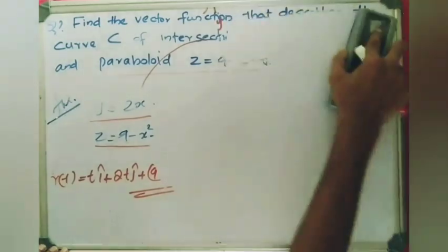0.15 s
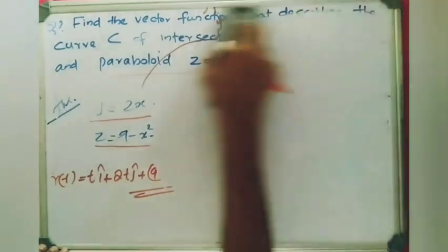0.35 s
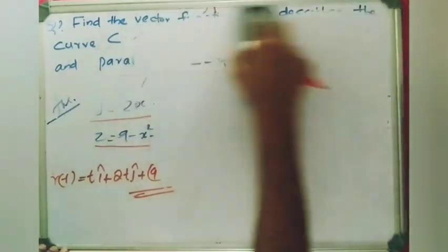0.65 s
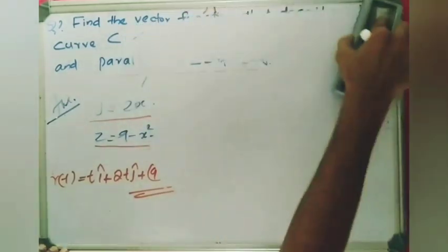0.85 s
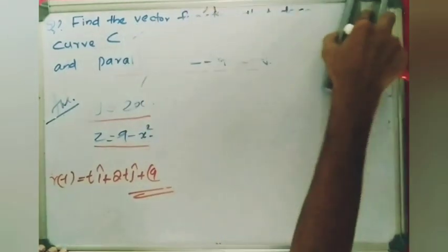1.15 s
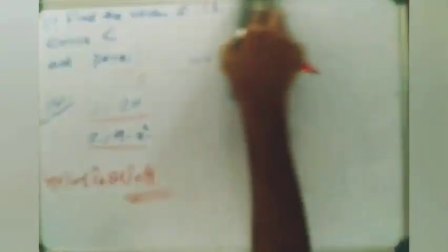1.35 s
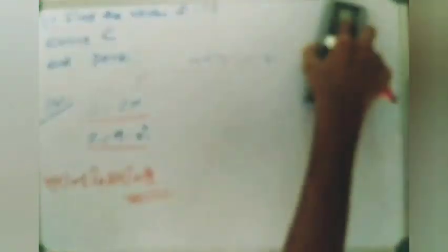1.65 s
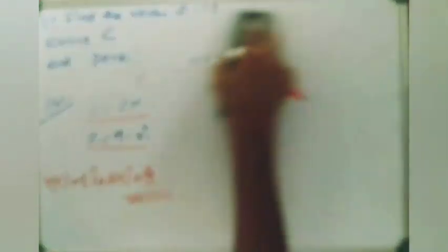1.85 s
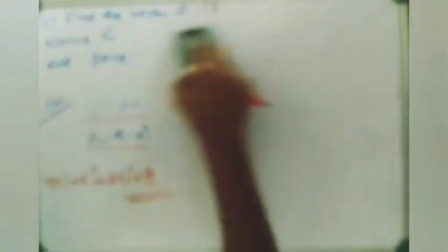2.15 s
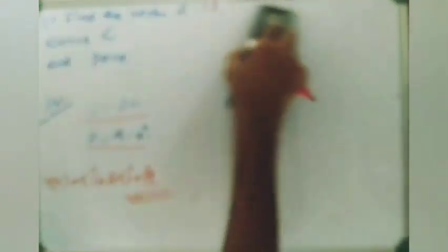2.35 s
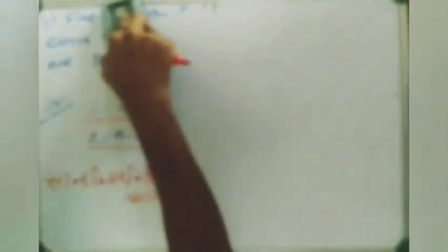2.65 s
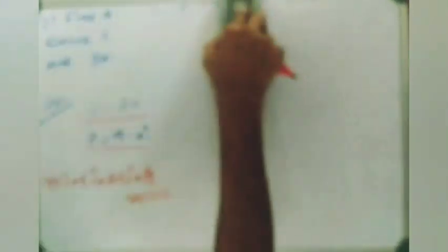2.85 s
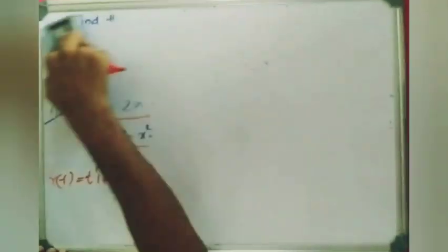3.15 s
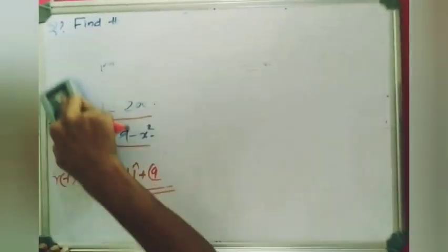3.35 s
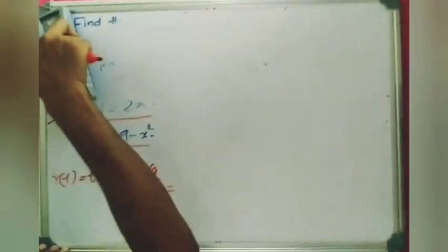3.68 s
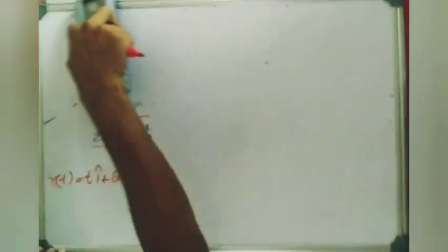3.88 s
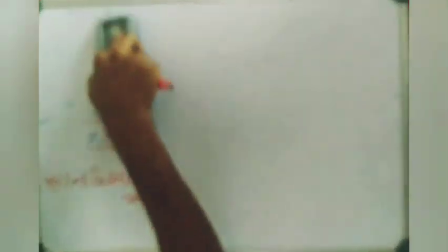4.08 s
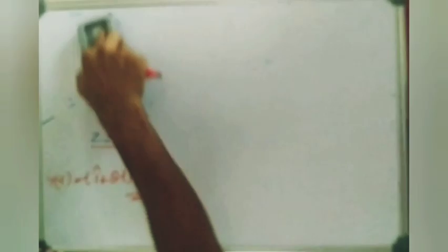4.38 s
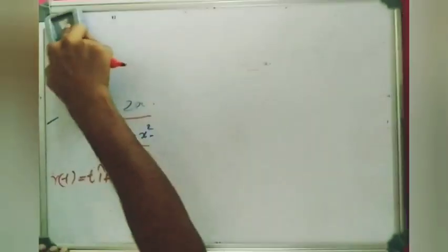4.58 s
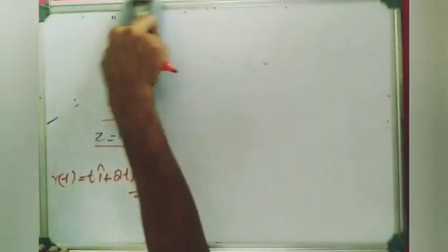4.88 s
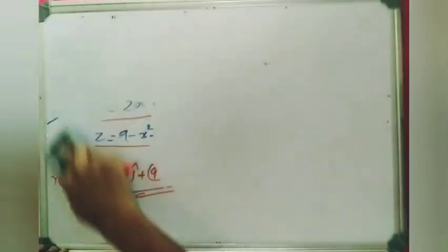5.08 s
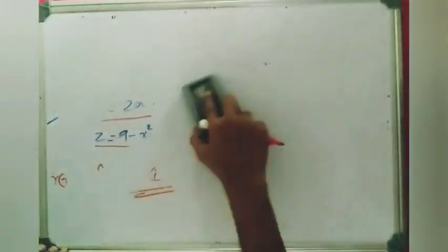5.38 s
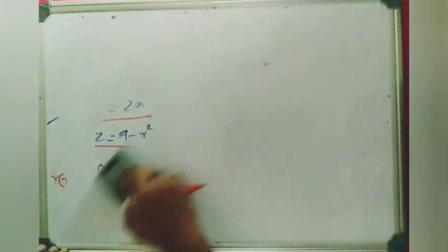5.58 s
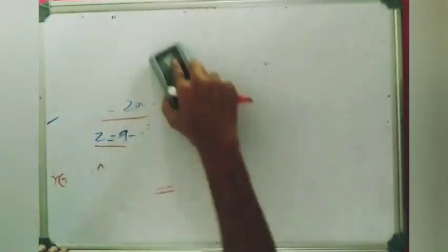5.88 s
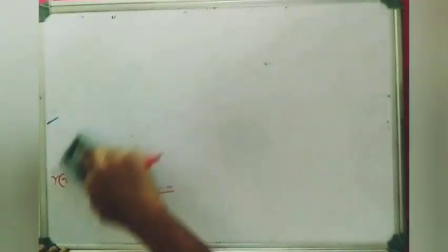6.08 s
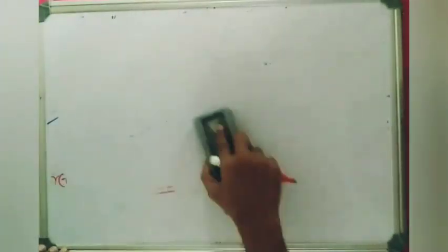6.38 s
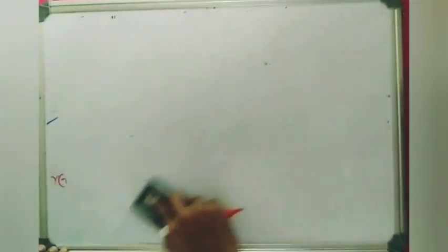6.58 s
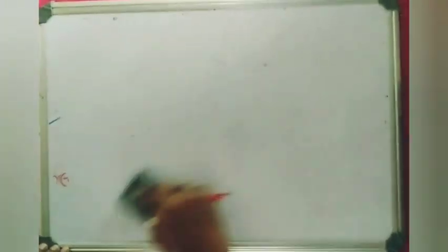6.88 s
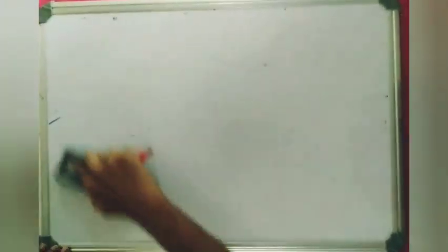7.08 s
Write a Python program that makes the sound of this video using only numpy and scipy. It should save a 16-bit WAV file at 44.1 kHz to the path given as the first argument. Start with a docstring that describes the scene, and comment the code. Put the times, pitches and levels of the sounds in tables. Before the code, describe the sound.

An eraser wipes a hanging board in brisk uneven strokes, each hiss swelling and brightening with speed. The first half is nearly all rubbing; the second adds panel thuds, plastic taps, small groans and a firmer bump near the end. Stereo microphones sit close in a small room. Behind are a low engine drone falling in pitch, a high insect chorus with falling whistles, and a faint hum.

```python
"""The hiss of felt comes first, close by: an eraser wipes a hanging whiteboard in quick strokes, in a small room.
Noise that follows the hand's speed makes the hiss; bands of slips make faint squeaks; blows and slips ring
the modes of panel and case as light knocks, soft thuds and two spells of hollow scraping drags.
Far outside, a motorbike's firing harmonics ease off and coast, a gliding tone repeats an insect's falling
whistle and a farther engine drones late on; coloured noise gives rumbling air and a chorus of insects."""
import sys
import numpy as np
from scipy import signal
from scipy.fft import rfft, irfft
from scipy.io import wavfile
from scipy.ndimage import uniform_filter1d

SR = 44100
rng = np.random.default_rng(int(sys.argv[2]) if len(sys.argv) > 2 else 0)


def transcribe(signal):
    """Save signal, clipped to [-1, 1], as a 16-bit WAV file at the path in sys.argv[1]."""
    frames = np.atleast_2d(signal).T
    limited = np.clip(frames, -1, 1)
    pcm = np.round(limited * 32767).astype(np.int16)
    wavfile.write(sys.argv[1], SR, pcm)


N = 318828
T = np.arange(N) / SR  # time of each sample, s
HZ = np.fft.rfftfreq(N, 1 / SR)

# On the board, close to the microphones. Levels here are relative: each source adds its own trim.
# sweeps of the hand: start_s, length_s, fastest_point (share of the length), friction_db, extra_treble_db
HAND_SWEEPS = [(-.06, 0.29, 0.45, -56, -3.5), (0.207, 0.34, 0.7, -51.5, -2), (0.537, 0.39, 0.31, -56, 1),
               (0.902, 0.16, 0.14, -55, 1.5), (1.057, 0.11, 0.57, -53, -1), (1.157, 0.36, 0.58, -54, -0.5),
               (1.506, 0.22, 0.45, -56, 1.5), (1.724, 0.37, 0.51, -54, -1), (2.064, 0.27, 0.47, -57, -0.5),
               (2.332, 0.34, 0.74, -52.5, -1.5), (2.674, 0.25, 0.55, -53.5, -0.5),
               (2.916, 0.37, 0.41, -54, -1), (3.237, .22, 0.16, -56, 0.5), (3.448, 0.28, 0.4, -60.5, 2.5),
               (3.757, 0.4, 0.23, -54.5, 1.5), (4.124, 0.18, 0.49, -58.5, 2), (4.295, 0.33, 0.72, -57, 2.5),
               (4.634, 0.23, 0.32, -53.5, 2), (4.866, .16, 0.41, -54, 0.5), (4.97, 0.41, 0.38, -56, -1),
               (5.285, 0.19, 0.22, -52.5, -3), (5.47, 0.23, 0.47, -53.5, -2),
               (5.7, 0.27, 0.43, -54.5, -1.5), (5.939, 0.24, 0.41, -53, -1), (6.12, 0.32, 0.81, -56.5, 1.5),
               (6.412, 0.48, 0.29, -55.5, 1), (6.84, 0.25, 0.27, -56, -0.5),
               (7.053, 0.28, 0.46, -58.5, 1.5)]
# the felt's colour: frequency_hz, density_db (dB per Hz)
FELT_COLOUR = [(150, 1), (400, 1), (800, -9.5), (1500, -8.5), (1950, 0.5), (2250, 0), (2700, 3), (4000, 1),
               (6200, 0), (8500, -1.5), (12000, -4.5), (15800, -6.5)]
# the felt's edge catches: peak_s, level_db, length_s
EDGE_CATCHES = [(0.43, -55, 0.07), (1.93, -54, 0.062), (3.18, -53, 0.09), (3.772, -48.5, 0.054),
                (3.85, -50.5, 0.031), (4.068, -50.5, 0.077), (4.505, -52, 0.063), (5.22, -48, 0.024),
                (6.595, -50.5, 0.054), (6.675, -50, 0.024)]
# slow bending of the panel: mode_hz, width_hz, level_db
BENDING_MODES = [(236, 71, -17), (302, 120, 5.5), (380, 56, 3), (530, 250, -9)]
# soft thuds of the panel as the hand turns round: peak_s, level_db, length_s, pitch_factor (for that spot)
PANEL_THUDS = [(3.291, -62, 0.046, 1.26), (3.799, -59.5, 0.12, 0.92), (3.858, -65, 0.043, 1.2),
               (4.335, -58, 0.042, 1.05), (4.905, -60, 0.037, 1.5), (4.939, -61.5, 0.058, 1.37),
               (5.142, -59, .06, 1.06), (5.347, -61, .08, 1), (5.474, -60, .05, 0.97),
               (5.776, -61.5, 0.16, 0.98), (5.947, -58, 0.058, 1.02), (6.765, -59.5, .03, 1),
               (6.835, -47.5, 0.036, 1)]
# faint squeaks and groans of the felt: start_s, length_s, first_hz, last_hz, level_db, roughness (0-1)
FELT_SQUEAKS = [(2.81, 0.1, 7500, 7200, -61, .9), (4.03, 0.09, 4530, 4600, -57.5, .9),
                (4.405, 0.07, 1940, 2080, -56.5, .55), (4.423, 0.057, 1550, 1570, -58, 0.5),
                (4.45, .058, 1890, 1840, -59, 0.5), (4.5, 0.088, 2030, 1990, -70, 0.9),
                (4.575, 0.081, 1990, 1910, -58, .55), (6.024, 0.069, 6000, 6100, -56, .9),
                (6.58, 0.052, 1960, 1900, -62, 0.2), (6.62, 0.121, 580, 773, -60, .5),
                (6.68, 0.12, 1120, 1120, -62, .3), (6.718, 0.036, 1960, 1990, -69, 0.1),
                (6.721, 0.086, 730, 560, -62, .55), (6.849, 0.085, 702, 604, -60.5, .5),
                (6.93, 0.16, 750, 630, -62, .55), (6.93, 0.11, 1140, 1098, -66.5, 0.4)]
# the eraser knocks on the board: time_s, strength_db, case_share_db
ERASER_KNOCKS = [(3.275, -56.5, -12), (3.762, -63, 10), (3.85, -54.5, -16), (4.058, -62, 6),
                 (4.357, -62, -5), (4.892, -65, -9), (4.93, -65, 0), (5.024, -55, -18), (5.306, -59, -10),
                 (5.465, -51, -4), (5.668, -58, -18), (5.723, -67, 14), (5.927, -52, -7), (6.594, -66, 10),
                 (6.706, -61, -14), (6.76, -61, -14), (6.823, -47.5, -3)]
# modes of the board: mode_hz, width_hz, level_db
BOARD_MODES = [(290, 33, -1.5), (434, 50, -0.5), (538, 28, 2.5), (582, 55, 1), (662, 63, 4.5), (768, 56, 4),
               (830, 110, -5.5), (900, 59, -9), (975, 57, -2), (1090, 16, 3.5)]
# modes of the eraser's plastic case: mode_hz, width_hz, level_db
CASE_MODES = [(1460, 320, -1), (1780, 200, 1), (1890, 70, 3.5), (2160, 150, -4), (2430, 320, -9)]
# hollow drags of the eraser: start_s, loudest_s, end_s, panel_db, case_db
ERASER_DRAGS = [(4.354, 4.452, 4.95, -73, -61), (4.476, 4.55, 4.6, -67, -63), (6.555, 6.643, 6.9, -64, -66),
                (6.585, 6.732, 6.86, -54, -69), (6.757, 6.877, 7.25, -60.5, -68)]
SPEED_LAW = 0.54  # friction amplitude grows as hand speed to this power
TURN_DB = -65.5  # friction left while the hand turns round
LINGER_DB, LINGER_S = -15, 0.054  # the room carries some of each sweep's hiss across the turn

# Outside, far off.
# the motorbike's engine: time_s, firing_hz (firings per s)
ENGINE_FIRING = [(0, 24.7), (1, 24.65), (1.5, 24.45), (1.92, 24.25), (2.1, 23.2), (2.25, 23.8), (3, 23.2),
                 (3.7, 22.5), (4.2, 21.9), (5, 21.1), (5.5, 20.6), (6, 20.1), (6.5, 19.7), (7.23, 19.2)]
# its lowest harmonics, past walls and houses: time_s, boom_db (third), drone_db (fourth), hum_db (fifth)
LOW_HARMONICS = [(0, -74, -54, -65), (.3, -68, -46, -60), (.55, -68, -46, -63), (.7, -72, -51, -70),
                 (.9, -78, -48.5, -70), (1.25, -72, -49, -62), (1.6, -76, -55, -75), (1.98, -58, -52, -66),
                 (2.15, -54, -42.5, -62), (2.42, -56, -41, -59), (2.65, -48, -49, -60),
                 (2.8, -61, -56, -59), (3.15, -64, -49.5, -60), (3.6, -54, -51, -59), (3.8, -50, -46, -62),
                 (4.25, -55, -42.5, -64), (4.6, -56, -52, -53.5), (5, -61, -50.5, -57.5),
                 (5.5, -65, -50.5, -58), (5.85, -70, -57, -54.5), (6.15, -77, -53.5, -57),
                 (6.4, -76, -58, -50.5), (6.58, -74, -64, -68), (7.23, -79, -68, -81)]
# throttle: time_s, opening (0-1)
THROTTLE_OPENING = [(0, 0.6), (.6, 0.8), (1.1, 0.55), (1.4, 0.85), (1.85, 0.73), (2.05, 0.18)]
# coasting, four times in s: begins_s, fully_heard_s, starts_to_fade_s, gone_s
COAST_TIMES_S = (2.05, 2.2, 6.4, 6.55)
# exhaust under power: multiple (of the firing rate), level_db (at full throttle), change_db_per_s
POWERED_HARMONICS = [(6, -58, 2.5), (7, -64.5, -2), (8, -62.5, 1.5), (9, -65.5, 1), (10, -66, -11),
                     (11, -80.5, 4), (12, -66.5, 4), (13, -65, -1.5), (14, -78, 0), (18, -72, 1.5)]
# exhaust while coasting: multiple (of the firing rate), first_level_db, change_db_per_s
COASTING_HARMONICS = [(6, -56, -6.5), (7, -73.5, 2)]
# exhaust noise: frequency_hz, density_db (dB per Hz)
EXHAUST_ROAR = [(60, -35), (140, -13), (300, -1), (600, -8.5), (1200, -12), (1800, -15.5), (4000, -27),
                (15000, -78)]
# a farther engine comes and goes, one row: start_s, end_s, first_hz, last_hz, level_db
FARTHER_ENGINE = (5.5, 8, 191, 187, -64)
# the insect's slurs, about two a second: loudest_s, level_db
INSECT_SLURS = [(-.06, -63), (.4, -63), (.9, -67), (1.401, -66), (1.9, -60), (2.38, -61), (2.85, -64),
                (3.38, -56.5), (3.95, -56.5), (4.5, -61), (4.93, -57.5), (5.45, -59), (5.819, -57),
                (6.271, -54.5), (6.78, -55), (7.2, -63)]
# course of one slur: time_s (from its loudest moment), pitch_hz, level_db
SLUR_COURSE = [(-.8, 10520, -11), (-.4, 10200, -8), (-.15, 10010, -1), (.1, 9800, 0), (.3, 9640, -2),
               (.45, 9540, -12)]
# pitches the room favours in the whistle: peak_hz, width_hz, level_db
ROOM_WHISTLE_PEAKS = [(9585, 30, 0), (9730, 40, 0), (9790, 40, -5), (9860, 50, -2), (9975, 35, 0),
                      (10120, 35, 0), (10300, 80, -7), (10440, 40, -1)]
# farther insects: frequency_hz, density_db (dB per Hz)
INSECT_CHORUS = [(8600, -11), (9300, -3.5), (9600, 2.5), (9950, 6.5), (10200, 3), (10500, -2), (10750, -30),
                 (11000, -31)]

# The place and the pair of microphones.
# still room: frequency_hz, density_db (dB per Hz)
ROOM_AIR = [(12, -3), (26, -13), (33, -1), (41, 2), (53, -14.5), (100, -8.5), (160, -20.5), (250, -26.5),
            (500, -30.5), (1000, -31), (1600, -36), (3000, -46), (8000, -54), (15800, -77)]
# steady hum: pitch_hz, level_db
HUM_TONES = [(196, -76), (603, -82.5), (1107, -92)]
# likeness of left and right in diffuse sound: frequency_hz, likeness (0-1)
LEFT_RIGHT_LIKENESS = [(40, 0.96), (130, 0.93), (300, 0.99), (600, 0.35), (1200, 0.017), (3000, 0.014),
                       (15000, 0.022)]
# colour difference of the microphones: frequency_hz, left_minus_right_db
MICROPHONE_BALANCE = [(30, -1), (90, 2), (160, 3.5), (300, 0), (900, 0.2), (5000, 0.3), (10000, -1),
                      (15000, -.4)]
STREET_DB, STREET_FADE_DB = 2.5, -5.5  # the street's rumble holds, then sinks this much as the motorbike leaves
EDGE_HZ = 15850  # top of the band


def amp(db):
    """Decibels to gain."""
    return 10 ** (np.asarray(db) / 20)


def unit(x):
    """Scales to rms 1."""
    return x / np.sqrt(np.mean(x ** 2) + 1e-20)


def colour(points, hz=HZ):
    """Reads a table over log frequency."""
    f, value = np.transpose(points)
    return np.interp(np.log(hz + 1), np.log(f + 1), value)


def curves(rows):
    """Reads each column of a table at every sample."""
    s, *columns = np.transpose(rows)
    return [np.interp(T, s, column) for column in columns]


def shaped(x, gain):
    """Filters by a gain per frequency."""
    return irfft(rfft(x) * gain, N)


def add(mix, s, sound):
    """Lays a sound into a track at a time."""
    part = mix[round(s * SR):][:len(sound)]
    part += sound[:len(part)]


def drift(per_s, size=16384):
    """Slow random wandering of rms 1, with rates up to about per_s cycles a second."""
    hz = np.fft.rfftfreq(size, T[-1] / size)
    slow = irfft(rfft(rng.standard_normal(size)) * (hz > 0) / (1 + (hz / per_s) ** 4))
    return unit(np.interp(T, np.linspace(0, T[-1], size), slow))


def pair():
    """Noise at two microphones: alike in the bass, nearly unrelated in the treble."""
    a, b = rng.standard_normal((2, N))
    same = np.clip(colour(LEFT_RIGHT_LIKENESS), -1, 1)
    return np.array([a, shaped(a, same) + shaped(b, np.sqrt(1 - same ** 2))])


def room(x, wet_db, t60):
    """Direct sound plus a diffuse decaying tail for each microphone, rescaled to hold the total power."""
    t = T[:SR // 2]
    tail = pair()[:, :len(t)] * amp(-60 * t / t60) * (t > .003)
    tail *= amp(wet_db) / np.linalg.norm(tail[0])
    echoes = signal.fftconvolve(x[None], tail, axes=1)[:, :N]
    return (x + echoes) / np.sqrt(1 + amp(wet_db) ** 2)


def grains(per_s, spread_db):
    """Tiny slips at random moments, a few much larger than the rest."""
    size = amp(spread_db * np.minimum(rng.exponential(1, N), 4)) * rng.choice([-1, 1], N)
    return unit(size * (rng.random(N) < per_s / SR))


def ring(force, modes, spot_db=0, tuning=1, order=3):
    """A force rings a set of damped modes; the spot that is touched favours some of them."""
    t = T[:SR // 6]
    response = np.zeros(len(t))
    for hz, width, db in modes:
        gain = amp(db + spot_db * rng.standard_normal())
        response += gain * width * np.exp(-np.pi * width * t) * np.cos(2 * np.pi * hz * tuning * t)
    edges_hz = [.8 * tuning * modes[0][0], 1.15 * tuning * modes[-1][0]]
    response = signal.sosfilt(signal.butter(order, edges_hz, "band", fs=SR, output="sos"), response)
    return signal.oaconvolve(force, response / np.linalg.norm(response))[:len(force)]


def mottled(x, depth_db):
    """Random patches, some 300 Hz by 40 ms, make a hiss flicker."""
    z = signal.stft(x, nperseg=1024, noverlap=768)[2]
    patches = rng.standard_normal(z.shape[1:])
    for axis in (0, 1):
        patches = uniform_filter1d(patches, size=7, axis=axis)
    gain = amp(depth_db * np.minimum(unit(patches), 1))
    return unit(signal.istft(z * gain, nperseg=1024, noverlap=768)[1][:, :N])


def swells(rows):
    """A sum of smooth bumps, one for each row of peak_s, level_db, length_s."""
    return sum(amp(db) * np.exp(-(2 * (T - s) / length) ** 2) for s, db, length in rows)


def hand():
    """Each sweep speeds up and slows down in one arch; gives friction amplitude and extra treble in dB."""
    power, treble = amp(TURN_DB) ** 2 * np.ones(N), np.zeros(N)
    for start, length, fastest, db, treble_db in HAND_SWEEPS:
        travel = np.interp((T - start) / length, [0, np.clip(fastest, .05, .95), 1], [0, .5, 1])
        speed = np.maximum(np.sin(np.pi * travel), 0)
        sweep = (amp(db) * speed ** SPEED_LAW) ** 2
        power += sweep
        treble += sweep * treble_db  # weighted by power, averaged below
    keep = np.exp(-1 / (LINGER_S * SR))
    lingering = signal.lfilter([1 - keep], [1, -keep], power)
    friction = np.sqrt((power + amp(LINGER_DB) ** 2 * lingering) / (1 + amp(LINGER_DB) ** 2))
    return friction, treble / power


def felt(level_db=4.0, grain_db=-6, flutter_db=0.41, patch_db=0.9, mottle_db=3.0,
         brighten=0.25, direct_db=-8, lag_s=0.000378):
    """Countless fibres slip on the board; hiss grows and brightens with hand speed, and grip shifts its colour."""
    friction, grip_db = hand()
    treble_db = grip_db + brighten * 20 * np.log10(friction / np.median(friction))
    slips = grains(3000, 1.5)
    late = shaped(slips, np.exp(-2j * np.pi * HZ * lag_s))
    direct = np.array([late, slips])  # reaches the right microphone first
    echoes = pair() + amp(grain_db) * room(grains(1500, 5.2), wet_db=8.0, t60=0.14)
    hiss = mottled(shaped(echoes + amp(direct_db) * direct, amp(colour(FELT_COLOUR))), mottle_db)
    # overlapping bands, each with its own small drift and its part of the treble tilt
    centres = np.geomspace(700, 14000, num=9)
    out = np.zeros((2, N))
    for hz, share in zip(centres, np.eye(len(centres))):
        tilt_db = treble_db * np.clip(np.log(hz / 4000) / np.log(3), 0, 1)
        out += shaped(hiss, colour(np.c_[centres, share])) * amp(tilt_db + patch_db * drift(9.5))
    rubbing = np.hypot(amp(level_db) * friction, swells(EDGE_CATCHES))
    return out * rubbing * amp(flutter_db * drift(26))


def flexing(thud_db=1, lean_db=-20, spot_db=2):
    """The panel bends a little under every sweep and thuds at the turns, higher or lower with the spot."""
    out = ring(amp(lean_db) * hand()[0] * grains(2000, 1.3), BENDING_MODES)
    t = T[:SR // 3] - T[SR // 6]  # centred on the thud
    for s, db, length, tuning in PANEL_THUDS:
        push = rng.standard_normal(len(t)) * np.exp(-(2 * t / length) ** 2)
        add(out, s + t[0], amp(thud_db + db) * ring(push, BENDING_MODES, spot_db, tuning))
    return out


def motorbike(waver_db=2.0, smear=0.11, roar_db=-61):
    """One cylinder heard through the walls: powered harmonics and roar fade when the throttle shuts."""
    firing_hz, = curves(ENGINE_FIRING)
    boom_db, drone_db, hum_db = curves(LOW_HARMONICS)
    throttle, = curves(THROTTLE_OPENING)
    phase = 2 * np.pi * np.cumsum(firing_hz) / SR
    tones = np.zeros(N)
    for k, db in (3, boom_db), (4, drone_db), (5, hum_db):
        tones += amp(db) * np.cos(k * phase)
    coasting = np.interp(T, COAST_TIMES_S, [0, 1, 1, 0])
    throttle = throttle * np.interp(T, COAST_TIMES_S[:2], [1, 0])  # shut fully once coasting
    powered_part = POWERED_HARMONICS, throttle, T
    coasting_part = COASTING_HARMONICS, coasting, T - COAST_TIMES_S[1]
    for harmonics, share, since_s in (powered_part, coasting_part):
        for k, db, db_per_s in harmonics:
            size = share * amp(db + db_per_s * since_s + waver_db * drift(2.25))
            scatter = rng.uniform(-np.pi, np.pi) * np.clip((k - 5) / 2, 0, 1)  # echoes scramble the upper ones
            tones += size * np.cos(round(k) * phase + scatter + smear * drift(5.3))
    roar = unit(shaped(pair(), amp(colour(EXHAUST_ROAR))))
    return np.sqrt(2) * tones + amp(roar_db) * throttle * roar


def insect(level_db=1.5, jitter_hz=12, rasp=0.14, plain_db=-15, fade_db=3.5, bend_hz=14):
    """Overlapping whistles slide down in pitch, fade in and out, and arrive mostly as echoes."""
    s, pitch_hz, shape_db = np.transpose(SLUR_COURSE)
    jitter = jitter_hz * drift(120) + bend_hz * drift(7.16)
    fades = fade_db * drift(8)
    out = np.zeros(N)
    for top, db in INSECT_SLURS:
        on = (T > top + s[0]) & (T < top + s[-1])
        t, shift = T[on] - top, rng.integers(N)  # the shift gives each slur its own wandering
        hz = np.interp(t, s, pitch_hz) + np.roll(jitter, shift)[on]
        gain = amp(db + np.interp(t, s, shape_db) + np.roll(fades, shift)[on])
        out[on] += np.sqrt(2) * gain * np.sin(2 * np.pi * np.cumsum(hz) / SR)
    favoured = amp(plain_db)
    for hz, width, db in ROOM_WHISTLE_PEAKS:
        favoured = favoured + amp(db) / (1 + (2 * (HZ - hz) / width) ** 2)
    whistle = shaped(out * (1 + rasp * drift(87)), favoured)
    return amp(level_db) * room(whistle, wet_db=12, t60=0.6)


def background(air_db=-48.5, chorus_db=-56.5, hum_waver=0.68, street_hz=500):
    """Rumbling air, a faint wavering hum and the steady sizzle of farther insects."""
    street_db = STREET_DB + STREET_FADE_DB * (T / T[-1]) ** 3
    air = amp(air_db) * unit(shaped(pair(), amp(colour(ROOM_AIR))))
    low_air = shaped(air, 1 / (1 + (HZ / street_hz) ** 2))
    air = air + low_air * (amp(street_db) - 1)
    band = (HZ > INSECT_CHORUS[0][0]) * (HZ < INSECT_CHORUS[-1][0])
    chorus = amp(chorus_db) * unit(shaped(pair(), amp(colour(INSECT_CHORUS)) * band))
    hum = np.zeros(N)
    for hz, db in HUM_TONES:
        hum += np.sqrt(2) * amp(db) * np.sin(2 * np.pi * hz * T + hum_waver * drift(7.6))
    return air + chorus + hum


def squeaks(width=0.038, base_hz=35, wobble=0.0085):
    """The felt half sings: a wobbling tone in a narrow band of slips swells, glides and fades."""
    out = np.zeros(N)
    for s, length, start_hz, end_hz, db, rough in FELT_SQUEAKS:
        on = (T > s) & (T < s + length)
        u = (T[on] - s) / length
        slips, rough = drift(base_hz + width * start_hz), np.clip(rough, 0, 1)
        glide_hz = start_hz + (end_hz - start_hz) * u
        phase = 2 * np.pi * np.cumsum(glide_hz * (1 + wobble * np.roll(slips, N // 3)[on])) / SR
        # a pure tone blended with complex noise, which widens it into a band
        noise = (slips[on] + 1j * np.roll(slips, N // 2)[on]) / np.sqrt(2)
        voice = 1 - rough + rough * noise
        out[on] += amp(db) * np.sin(np.pi * u) * unit((voice * np.exp(1j * phase)).real)
    return out


def knocks(panel_db=2.0, case_db=2, rattle_s=0.017, blow_db=22, spot_db=1.5, soft_hz=1200):
    """Each knock is one cushioned blow and a short rattle of contacts; they ring the panel and the case."""
    out, t = np.zeros(N), T[:SR // 5]
    for s, db, share_db in ERASER_KNOCKS:
        force = rng.standard_normal(len(t)) * np.exp(-t / rattle_s) + amp(blow_db) * (t == 0)
        panel = amp(panel_db) * ring(force, BOARD_MODES, spot_db)
        case = amp(case_db + share_db) * ring(force, CASE_MODES, spot_db)
        add(out, s, amp(db) * (panel + case))
    return shaped(out, 1 / (1 + 1j * HZ / soft_hz))  # the cushioning dulls the blow


def drags(uneven_db=2):
    """Pressed hard, the eraser sticks and slips, and panel and case sound hollow."""
    panel, case = np.zeros((2, N))
    for start, top, end, panel_db, case_db in ERASER_DRAGS:
        pressure = np.interp(T, [start, top, end], [0, 1, 0])
        panel += pressure * amp(panel_db)
        case += pressure * amp(case_db)
    grip = amp(uneven_db * drift(35))
    panel_sound = ring(grip * panel * grains(2000, 0.97), BOARD_MODES)
    return panel_sound + ring(grip * case * grains(2000, 1.7), CASE_MODES)


def far_drone():
    """One sinking engine note swells and fades."""
    start, end, first_hz, last_hz, db = FARTHER_ENGINE
    u = np.clip((T - start) / (end - start), 0, 1)
    phase = 2 * np.pi * np.cumsum(first_hz + (last_hz - first_hz) * u) / SR
    return np.sqrt(2) * amp(db) * np.sin(np.pi * u) * np.sin(phase)


def scene():
    """The board close by, the street and the insects behind it."""
    rubbed = room(drags() + flexing() + squeaks(), wet_db=2.5, t60=0.11)
    knocked = room(knocks(), wet_db=-0.5, t60=0.1)
    outside = motorbike() + far_drone() + insect()
    return felt() + rubbed + knocked + outside + background()


def record(dry):
    """The two microphones differ a little in colour; then the band limit."""
    tilt = amp(np.outer([.5, -.5], colour(MICROPHONE_BALANCE)))
    low_pass = signal.firwin(1023, EDGE_HZ, window=("kaiser", 9), fs=SR)
    return signal.oaconvolve(shaped(dry, tilt), low_pass[None], "same")


dry = scene()
out = record(dry)
transcribe(out)
```